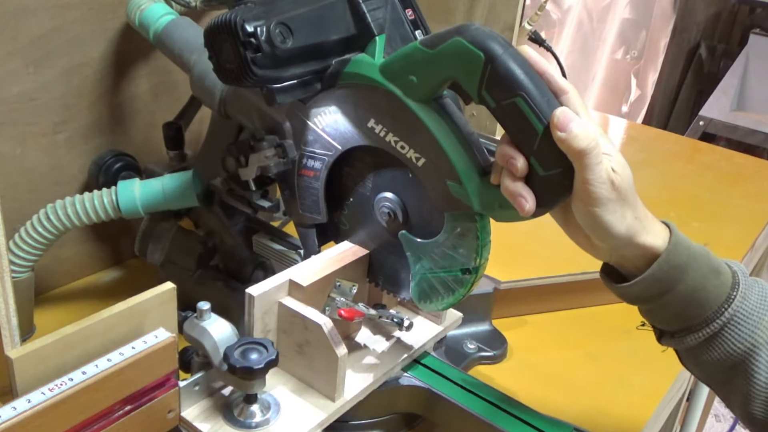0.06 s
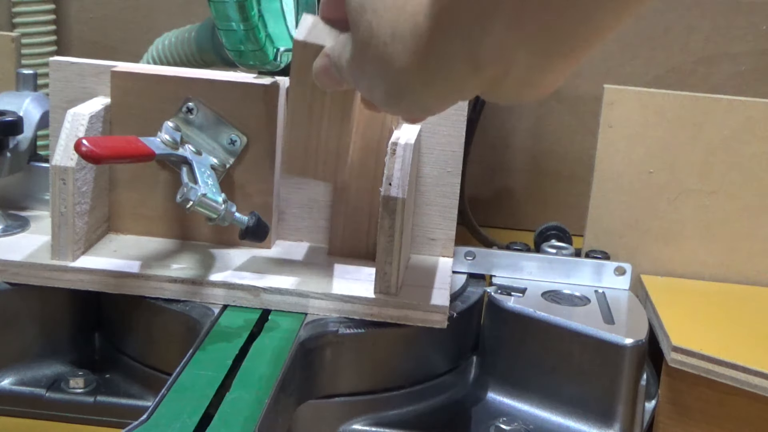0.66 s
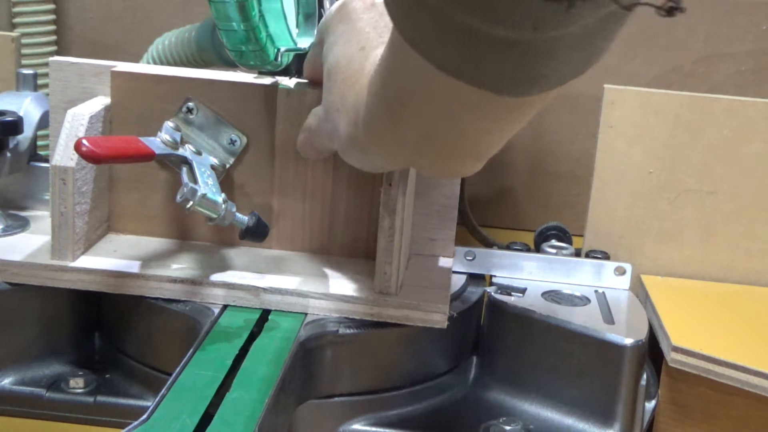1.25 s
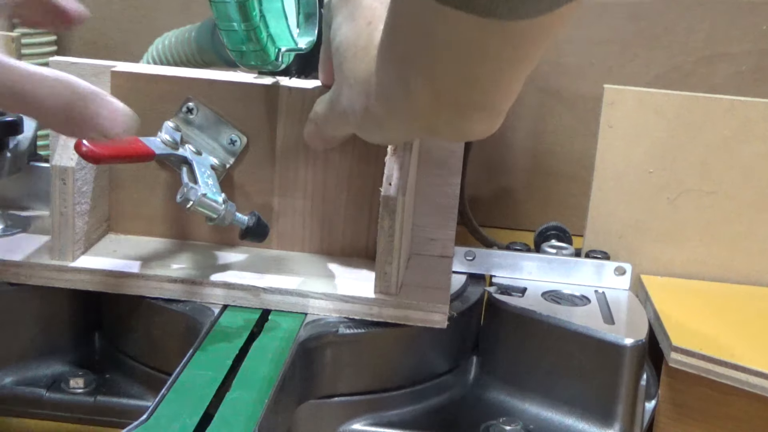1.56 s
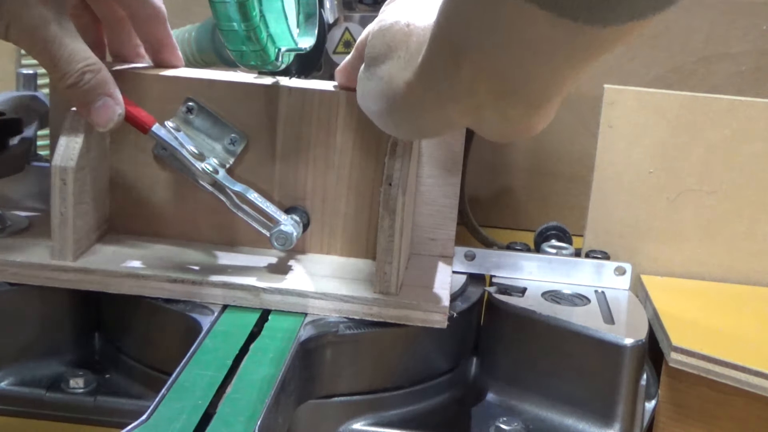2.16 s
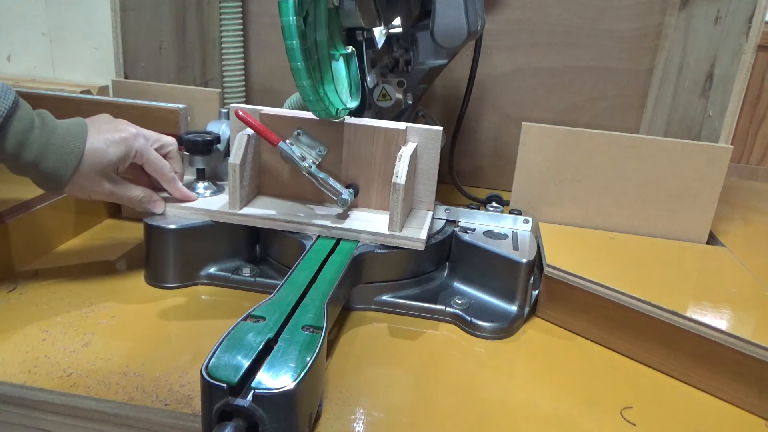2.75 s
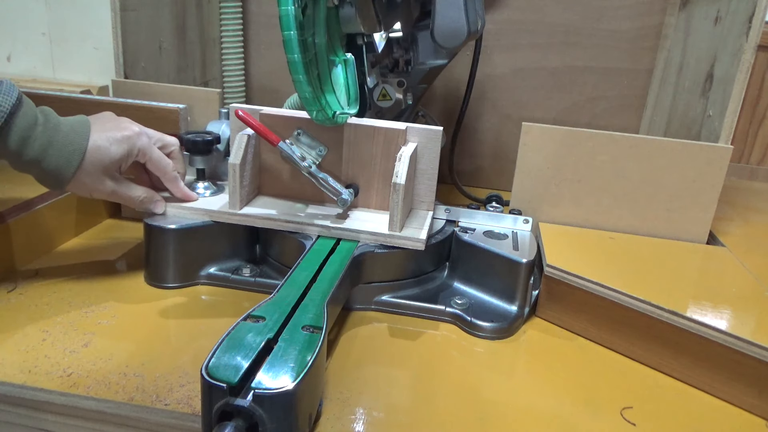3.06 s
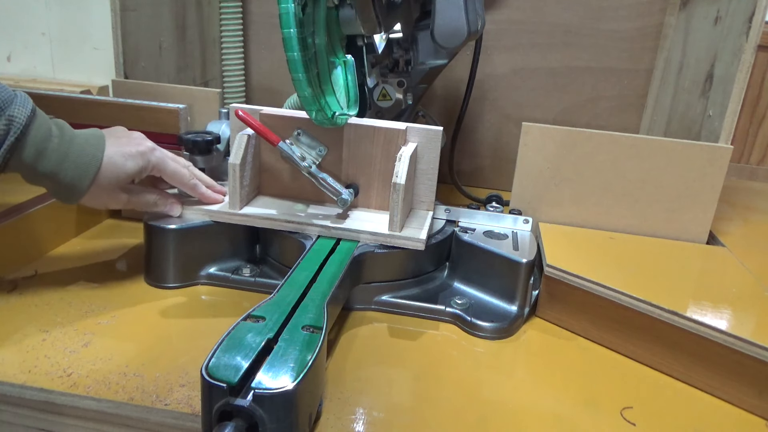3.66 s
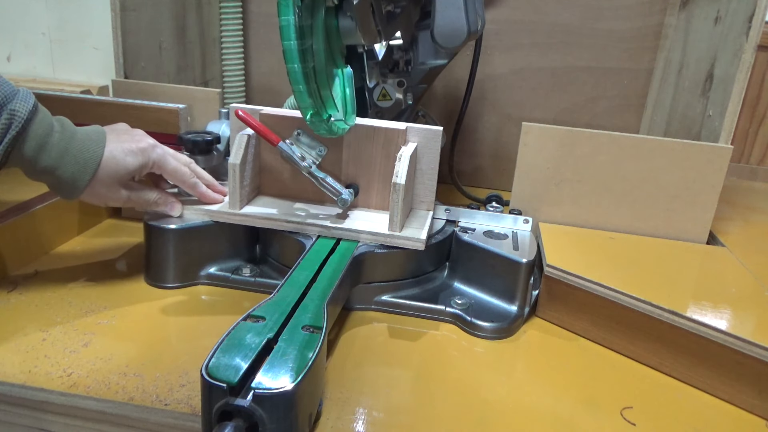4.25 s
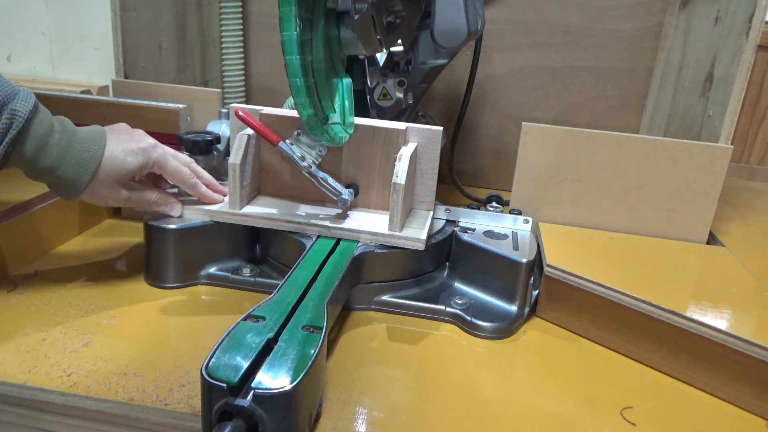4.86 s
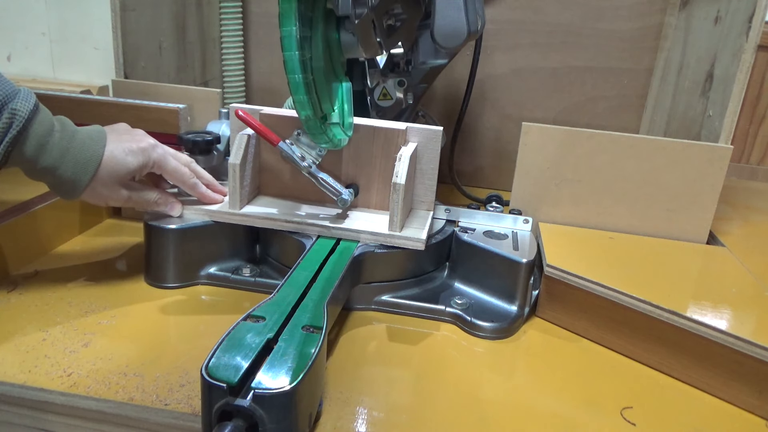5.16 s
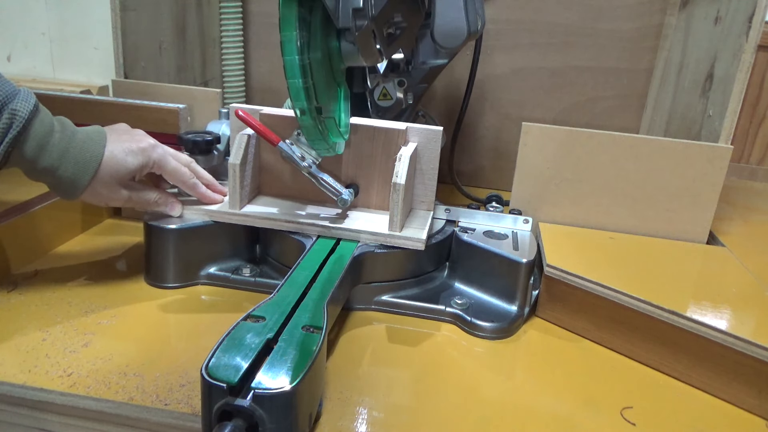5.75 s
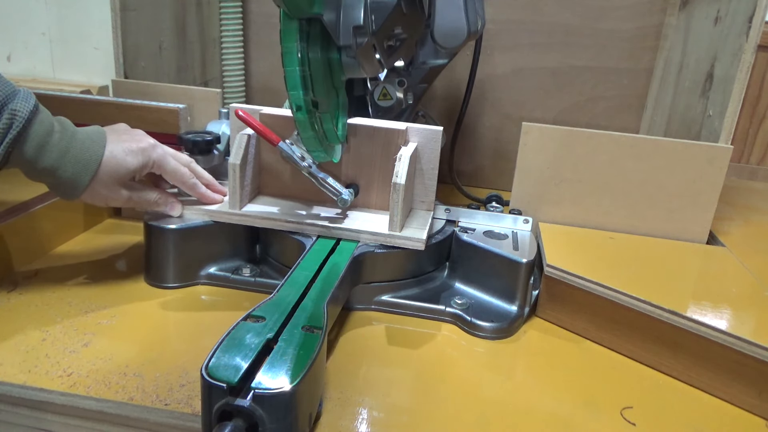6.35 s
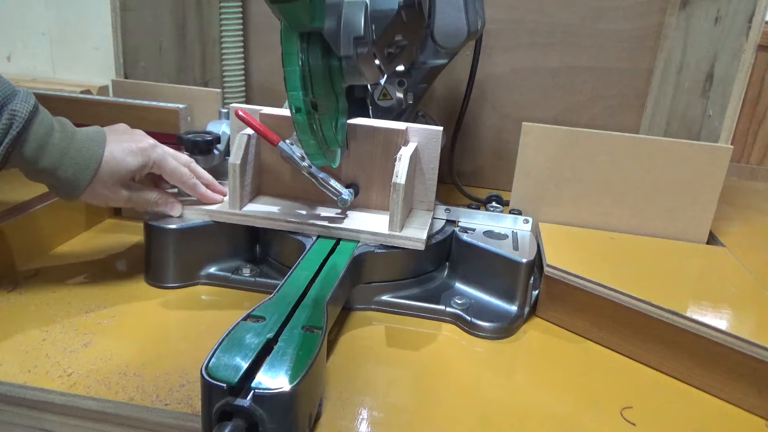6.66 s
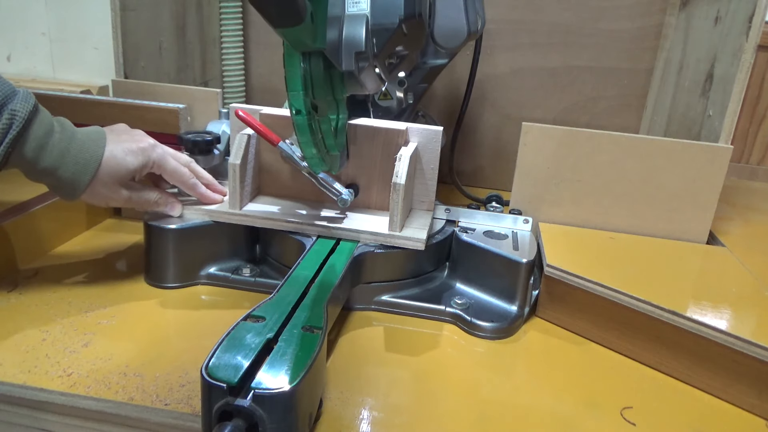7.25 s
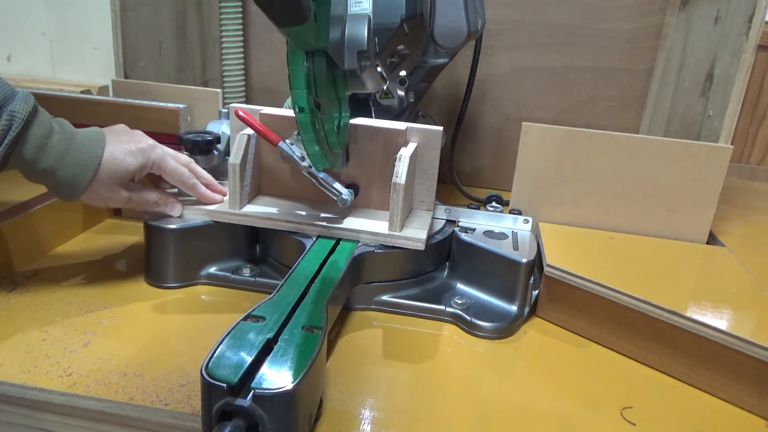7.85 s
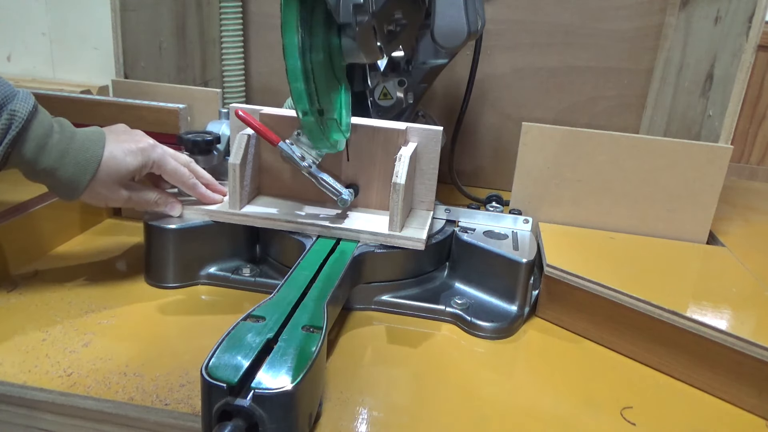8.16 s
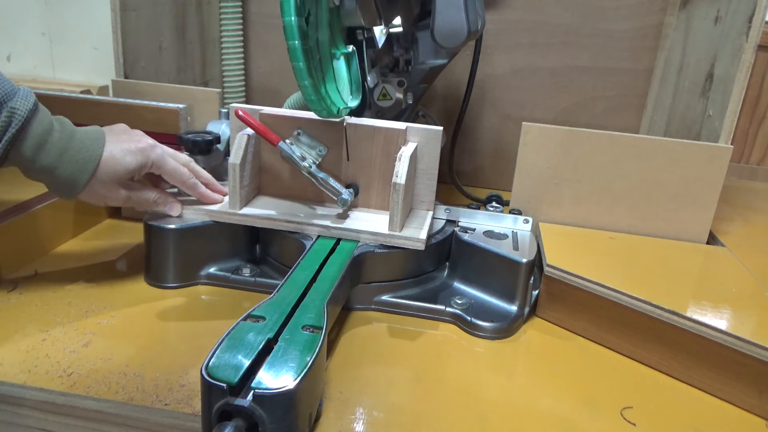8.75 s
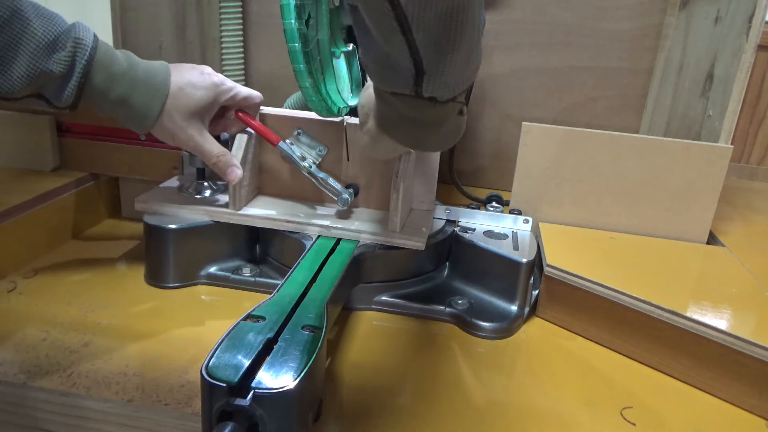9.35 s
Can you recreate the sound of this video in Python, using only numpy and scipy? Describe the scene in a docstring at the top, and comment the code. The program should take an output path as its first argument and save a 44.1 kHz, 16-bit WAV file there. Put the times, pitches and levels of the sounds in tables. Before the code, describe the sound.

Wood knocks and a clamp snaps shut, then a miter saw whines up, cuts slowly and winds down over a humming extractor.

```python
"""A miter saw at work in a small workshop, heard in stereo from close by the bench.
First a block of wood is set into the jig and a toggle clamp snaps shut. A dust extractor is suddenly
there, humming, and the saw spins up and runs free, its rotor whining in a rush of fan air. The rush drops
abruptly and the two gear stages sing as the blade is lowered slowly through the wood. The brake pulls
the motor down in a falling whine, and the extractor runs on."""
import sys
import numpy as np
from scipy import signal
from scipy.fft import rfft, irfft, next_fast_len
from scipy.io import wavfile

SR = 44100
rng = np.random.default_rng(int(sys.argv[2]) if len(sys.argv) > 2 else 0)


def generate_wav(sig):
    """Save sig (samples, or channels by samples) to the path in sys.argv[1] as 16-bit PCM at SR."""
    pcm = np.round(np.clip(np.atleast_2d(sig).T, -1, 1) * 32767).astype(np.int16)
    wavfile.write(sys.argv[1], SR, pcm)


N = 419391
T = np.arange(N) / SR
SWITCH_ON_S, OVERSHOOT_AT_S, FEED_START_S, TRIGGER_OFF_S, BRAKE_ON_S = 2.524, 2.86, 4.635, 8.28, 8.38
FULL_SPEED_HZ, ROTOR_TEETH, WHEEL_TEETH, ROTOR_SLOTS = 219.9, 13, 22, 36


def from_db(db):
    """Decibels to gain."""
    return 10 ** (np.asarray(db) / 20)

def rms_one(x):
    """Scale to rms 1."""
    return x / np.sqrt(np.mean(x ** 2) + 1e-20)

def in_time(rows):
    """Each column of a curve, at every sample."""
    times, *columns = np.transpose(rows)
    return [np.interp(T, times, column) for column in columns]

def at_hz(points, hz):
    """Read a spectrum on a log-frequency axis."""
    known_hz, values = np.transpose(points)
    return np.interp(np.log(np.maximum(hz, 1e-3)), np.log(known_hz), values)

def drift(rate, step=40):
    """Smooth random wander of rms 1, changing about rate times a second."""
    pole = np.exp(-2 * np.pi * step * rate / SR)
    slow = signal.lfilter([1], [1, -2 * pole, pole * pole], rng.standard_normal(N // step + 2002))[2000:]
    return np.interp(np.arange(N) / step, np.arange(len(slow)), rms_one(slow))

def after(start, rise_s=.004):
    """A straight ramp from 0 to 1."""
    return np.clip((T - start) / rise_s, 0, 1)

def held(start, end, rise, fall):
    """Swell smoothly around the start, hold, and fade around the end."""
    return (1 + np.tanh((T - start) / (2 * rise))) * (1 - np.tanh((T - end) / (2 * fall))) / 4

def tone(turns, flutter=0., rate=10):
    """A sine of rms about 1 whose height flutters."""
    return np.sqrt(2) * np.sin(2 * np.pi * turns) * (1 + flutter * drift(rate))

def ring(x, hz, t60):
    """One resonance, dying by 60 dB in t60 seconds."""
    pole, angle = from_db(-60 / (t60 * SR)), 2 * np.pi * hz / SR
    return signal.lfilter([0, np.sin(angle)], [1, -2 * pole * np.cos(angle), pole * pole], x + 1e-18)

def bandpass(x, low_hz, high_hz):
    """Keep one band, with gentle slopes."""
    return signal.sosfilt(signal.butter(2, [low_hz, high_hz], "band", fs=SR, output="sos"), x)

def pan(x, db):
    """Place a sound left (+) or right (-) of the microphone."""
    return x * from_db(np.array([[db], [-db]]) / 2)

# Stereo width at the microphone. Each row: frequency in Hz, side against mid in dB.
STEREO_WIDTH = [(30, -10), (70, -27), (250, -34.5), (600, -10.5), (1100, -6), (2500, -10.5), (5000, -12),
                (9000, -19.5), (14000, -14.5)]
def noise(spectrum):
    """Stereo noise of a given colour and rms 1, nearly alike in both channels."""
    size = next_fast_len(N, real=True)
    hz = np.arange(size // 2 + 1) * SR / size
    mid, side = rfft(rng.standard_normal((2, size))) * from_db(at_hz(spectrum, hz))
    side = side * from_db(at_hz(STEREO_WIDTH, hz))
    return rms_one(irfft([mid + side, mid - side], size)[:, :N])

# The quiet shop. Each row: frequency in Hz, relative level in dB.
ROOM_COLOUR = [(40, -1), (100, -3), (200, 0.5), (320, -0.5), (500, 3.5), (1000, 0), (2000, -2.5),
               (3700, -6), (5600, -6.5), (6350, -1), (7000, -7), (10000, -7), (16000, -21)]
def room_tone():
    """A faint, steady noise all around the microphone."""
    return from_db(-70.5) * noise(ROOM_COLOUR)

# The whistle's lower tone. Each row: time in seconds, pitch in Hz, level in dB.
WHISTLE_PATH = [(0, 7240, -70), (0.06, 7550, -68), (0.105, 7600, -65), (0.115, 7650, -120)]
def whistle():
    """Two thin, unsteady tones rise and stop at the outset."""
    hz, db = in_time(WHISTLE_PATH)
    turns = np.cumsum(hz) / SR
    lower = tone(turns + .4 * drift(150))
    upper = from_db(-4) * tone(1.48 * turns + .5 * drift(150))
    return from_db(db) * (lower + upper)

# Rubs on the jig. Each row: centre and half length in seconds, hollow and hiss levels in dB.
RUBS = [(0.265, .01, -78, -67), (0.34, 0.025, -72, -69), (0.489, 0.014, -65, -57.5),
        (0.696, 0.035, -70, -62.5), (0.806, 0.035, -59, -74), (0.965, 0.017, -59.5, -72),
        (1.06, 0.041, -64.5, -59), (1.204, .04, -65, -72), (1.296, 0.026, -58, -67),
        (1.403, 0.021, -59, -62), (1.718, .04, -61, -67.5), (1.904, 0.018, -60.5, -64)]
# The two parts of a rub. Each row: frequency in Hz, relative level in dB.
HOLLOW_COLOUR = [(90, -30), (160, -5), (280, -13), (480, 5), (750, -15), (1100, -13), (2400, -13),
                 (4000, -34)]
HISS_COLOUR = [(1500, -15), (3000, -1), (4500, -5), (8000, -4), (11000, -10), (16000, -7)]
def handling():
    """Fingers and wood slide on the jig; each rub swells and fades."""
    centre, half_length, hollow_db, hiss_db = np.transpose(RUBS)
    strokes = np.exp(-.5 * ((T - centre[:, None]) / half_length[:, None]) ** 2)
    hollow = from_db(hollow_db) @ strokes * from_db(3.6 * drift(50)) * noise(HOLLOW_COLOUR)
    hiss = from_db(hiss_db) @ strokes * from_db(2.5 * drift(80)) * noise(HISS_COLOUR)
    return hollow + hiss

# Block, jig and clamp at the bench. Each row: start in seconds, strength in dB, low and high band
# edges in Hz, note in Hz, contact time in milliseconds.
CONTACTS = [(0.528, -41, 200, 900, 420, 12), (0.585, -31, 850, 7000, 1420, 2.5),
            (0.586, -33, 1050, 6000, 2900, 1.4), (0.732, -32.5, 350, 2540, 1970, 2.8),
            (0.736, -26.5, 350, 703, 492, 3.6), (0.82, -49, 400, 3000, 2850, 3.6),
            (0.934, -46, 500, 4500, 2850, 2.7), (1.097, -24.5, 150, 1780, 1900, 3.7),
            (1.310, -23, 300, 5130, 476, 2.5), (1.946, -30, 250, 1600, 484, 2.7),
            (2.0528, -10.5, 450, 10500, 3260, 2.6), (2.382, -36, 700, 7950, 3770, 2)]
# The ringing jig. Each row: frequency in Hz, relative level in dB, seconds to fall 60 dB.
JIG_MODES = [(478, -8.5, 0.083), (990, -1.5, 0.028), (1540, -5, .025), (2030, 6, 0.02), (2390, 4, 0.027),
             (2960, 0.5, 0.017), (3400, 1.5, 0.011), (4650, 1, 0.0073), (5500, -10, .012)]
# The crack of a contact. Each row: frequency in Hz, relative level in dB.
CRACK_COLOUR = [(100, -15), (400, -0.5), (1500, -6), (3200, 0), (5500, -4), (7000, -9.5), (9000, -5.5),
                (16000, -5)]
def knocks(size=8820):
    """Each contact is a crack, the ringing jig and the brief note of the struck spot."""
    direct, t = np.zeros(N), np.arange(size) / SR
    grit = noise(CRACK_COLOUR)[0]
    for start, db, low_hz, high_hz, note_hz, contact_ms in CONTACTS:
        i = round(start * SR)
        crack = grit[i:i + size] * (np.exp(-t * 1e3 / contact_ms) + .11 * np.exp(-t / .011))
        jig = 0
        for hz, mode_db, t60 in JIG_MODES:
            height = from_db(mode_db + rng.normal(0, 2.7)) * rng.choice([-1, 1])
            jig += height * np.sin(2 * np.pi * hz * t) * from_db(-60 * t / t60)
        note = from_db(-10.5) * np.sin(2 * np.pi * note_hz * t) * np.exp(-t * note_hz / 4.4)
        hit = bandpass(from_db(-.5) * crack + from_db(-15) * jig + note, low_hz, high_hz)
        direct[i:i + size] += from_db(db) * (hit + from_db(-36) * crack)
    return direct + from_db(-11) * shop_reverb(direct)

# The workshop's decay. Each row: frequency in Hz, seconds to fall 60 dB.
SHOP_DECAY = [(100, 0.42), (1000, 0.27), (3500, 0.31), (7000, 0.19), (16000, .17)]
# What the walls send back. Each row: frequency in Hz, relative level in dB.
WALL_COLOUR = [(100, -20.5), (800, 6), (3300, 0), (6000, -1), (16000, -10)]
def shop_reverb(x, size=22050):
    """The small room answers, each band dying at its own rate."""
    t, tail = np.arange(size) / SR, 0
    edges = np.geomspace(60, 17000, 9)
    for low, high in zip(edges, edges[1:]):
        hz = np.sqrt(low * high)
        mid, side = bandpass(rng.standard_normal((2, size)), low, high)
        decay = from_db(at_hz(WALL_COLOUR, hz) - 60 * t / at_hz(SHOP_DECAY, hz))
        tail += (mid + .33 * side * [[1], [-1]]) * decay
    return signal.fftconvolve(x[None], rms_one(tail) / np.sqrt(size), axes=1)[:, :N]

# The extractor, just right of centre. Each row: frequency in Hz, relative level in dB.
HUM_TONES = [(118.4, -48.5), (349.9, -46.5), (549.1, -46.5), (613.7, -50.5), (936.7, -38.5), (1141, -48),
             (1873, -48)]
SUCTION_COLOUR = [(18, -24), (30, -22), (81, -21), (108, -7.5), (279, -3.5), (344, -2.5), (435, -3),
                  (551, 0.5), (698, -4.5), (931, -3.5), (1380, -5.5), (1840, -6), (4980, -14.5),
                  (12800, -21.5), (15800, -28)]
# Its hose. Each row: resonance in Hz, bandwidth in Hz, relative level in dB.
HOSE_MODES = [(128, 14, -81), (336, 23, -55), (544, 36, -40.5), (614, 18, -45), (921, 66, -40.5)]
def extractor(spool_db=-4, spool_s=.26, recorder_gain_db=-10.5):
    """Motor and impeller hum steadily over suction noise that resonates in the hose."""
    hum = hose = 0
    for hz, db in HUM_TONES:
        hum += from_db(db) * tone(hz * (T + .00008 * drift(3.1)), flutter=.16, rate=12)
    for hz, width, db in HOSE_MODES:
        airflow = np.diff(rng.standard_normal(N + 1))
        hose += from_db(db) * rms_one(ring(airflow, hz, t60=np.log(1000) / (np.pi * width)))
    suction = from_db(-34.5) * noise(SUCTION_COLOUR)
    turned_down = after(FEED_START_S) * (1 - after(7.13, rise_s=1.92))
    spooling = np.exp(-np.maximum(T - SWITCH_ON_S, 0) / spool_s)
    level = from_db(.5 + spool_db * spooling + recorder_gain_db * turned_down) * after(SWITCH_ON_S)
    return pan((hum + hose + suction) * level, db=-1)

def brush_ring():
    """Brush noise rings the motor housing from switch-on until the rush covers it."""
    housing = rms_one(ring(rng.standard_normal(N), hz=4060, t60=.013))
    return from_db(-48.5) * housing * after(SWITCH_ON_S) * (1 - after(OVERSHOOT_AT_S))

# The countershaft under load. Each row: time in seconds, speed in turns per second.
COUNTERSHAFT_SPEED = [(4.68, 129.78), (4.84, 129.33), (5.16, 129.34), (5.4, 128.83), (5.48, 129.08),
                      (5.96, 129.0), (6.16, 128.9), (6.24, 128.33), (6.28, 129.06), (6.52, 128.71),
                      (6.56, 128.91), (7.04, 128.8), (7.16, 129.81), (7.52, 128.93), (7.64, 129.44),
                      (7.72, 130.83), (8.16, 129.56), (8.24, 130.02)]
def rotor_speed(ungoverned_hz=244.7, run_up_mid_s=2.739, overshoot_hz=14, settle_s=.09, brake_s=.6):
    """Turns per second: the motor overshoots, is governed, takes the load, then brakes, hard at first."""
    run_up = ungoverned_hz * (1 + np.tanh((T - run_up_mid_s) / .086)) / 2
    governed = FULL_SPEED_HZ + overshoot_hz * np.exp(-np.maximum(T - OVERSHOOT_AT_S, 0) / settle_s)
    feeding = in_time(COUNTERSHAFT_SPEED)[0] * WHEEL_TEETH / ROTOR_TEETH
    driven = np.where(T < FEED_START_S, np.minimum(run_up, governed), feeding)
    return driven / (1 + np.maximum(T - BRAKE_ON_S, 0) / brake_s) ** 3.75

def octaves_down(speed):
    """How many octaves the rotor is below full speed."""
    return np.log2(FULL_SPEED_HZ / (speed + 1e-9))

# The saw's air running free, in the cut and at the bottom of the stroke.
# Each row: frequency in Hz, relative level in dB.
FREE_COLOUR = [(120, -49), (200, -18.5), (610, -15.5), (644, -10), (706, -16.5), (929, -8), (1040, -11),
               (1340, -11), (2080, -11.5), (2630, -8.5), (4900, -9), (8330, -4), (10000, -7.5),
               (12700, -5.5), (15800, -10)]
CUT_COLOUR = [(90, -12), (180, -4), (300, -8), (550, -3), (900, 0.5), (1500, -0.5), (2800, 5.5),
              (3500, 1.5), (5000, 2.5), (6500, 7.5), (9000, 6.5), (11000, 4.5), (12500, 10), (15000, 12),
              (16000, -0.5)]
DEEP_COLOUR = [(120, -50), (200, -23), (258, 0.5), (294, -32), (610, -15), (656, -8), (788, -16),
               (929, -8.5), (1670, -11.5), (3050, -3.5), (4560, -7), (4810, -9), (5680, -2.5),
               (14200, -1.5), (15800, -7.5)]
# That air once the head comes down. Each row: time in seconds, level at full speed in dB.
CUT_AIR_LEVEL = [(4.65, -26.5), (5.2, -22.5), (6.3, -24), (7.09, -26), (7.15, -22.5), (7.7, -20.5),
                 (8.2, -21.5)]
def air_rush(speed, free_db=-19, db_per_octave=7):
    """The rush of fan and blade grows with speed and changes colour as the head comes down."""
    cutting, deep = after(FEED_START_S), after(7.58, rise_s=.18)
    free_air = noise(FREE_COLOUR)
    cut_air = np.sqrt(1 - deep) * noise(CUT_COLOUR) + np.sqrt(deep) * noise(DEEP_COLOUR)
    rush = (1 - cutting) * free_air + cutting * cut_air
    level_db = (1 - cutting) * free_db + cutting * in_time(CUT_AIR_LEVEL)[0]
    level_db += .25 * drift(20) - db_per_octave * octaves_down(speed)
    return pan(rush * after(SWITCH_ON_S, rise_s=.08) * from_db(level_db), db=.3)

# Starting and braking. Each row: start and end in seconds, relative levels of mesh, rasp and slot
# whine in dB, the whine's loss in dB per halving of speed, its loss in dB per harmonic.
TORQUE_SURGES = [(2.689, 2.85, 1.5, -6, -17.5, 3, 28), (8.38, 9.0, -1.5, 1.5, -20, 8, 3)]
# How the gear case radiates mesh and rasp, and the motor housing the slot whine.
# Each row: frequency in Hz, gain in dB.
MESH_RESPONSE = [(470, -58), (1120, -38), (1450, -23), (1700, -30), (2300, -20), (3000, -25)]
RASP_RESPONSE = [(900, -46), (1600, -39), (2400, -50), (3800, -41), (4900, -17), (5500, -17), (6100, -27)]
HOUSING_RESPONSE = [(500, -14), (2000, -11), (3100, -9), (4000, 4), (5000, -5), (6400, 5.5), (8000, -1),
                    (12000, -10), (16000, -16), (20000, -80)]
def torque_howl(speed, turns):
    """Torque makes the first mesh howl and rasp; slot pulses sweep across the housing's resonances."""
    mesh_hz, mesh_turns = ROTOR_TEETH * speed, ROTOR_TEETH * turns
    shudder = np.where(T < FEED_START_S, .25, .05) * drift(160)   # stronger starting than braking
    slot_turns = ROTOR_SLOTS * turns + shudder
    mesh = from_db(at_hz(MESH_RESPONSE, mesh_hz)) * tone(mesh_turns, flutter=.33, rate=52)
    rasp = tone(2 * mesh_turns + .25 * drift(148), flutter=.3, rate=130)
    rasp *= from_db(at_hz(RASP_RESPONSE, 2 * mesh_hz))
    harmonics, howl = [], 0
    for k in range(1, 6):
        radiated_db = at_hz(HOUSING_RESPONSE, k * ROTOR_SLOTS * speed) + 3 * drift(19)
        harmonics.append(from_db(radiated_db) * np.sin(2 * np.pi * k * slot_turns))
    for start, end, mesh_db, rasp_db, slot_db, slowing_db, fall_db in TORQUE_SURGES:
        slots = sum(from_db(-fall_db * k) * harmonic for k, harmonic in enumerate(harmonics))
        slots *= from_db(slot_db + 3.5 - slowing_db * np.minimum(octaves_down(speed), 10))
        slots *= 1 + .37 * drift(120)
        torque = held(start, end, rise=.0019, fall=.014)
        howl += torque * (from_db(mesh_db) * mesh + from_db(rasp_db) * rasp + slots)
    return from_db(-4) * howl + from_db(-11.5) * shop_reverb(howl)

def revolving(turns, lines, loose, rate, size=8192):
    """A pattern that repeats with each turn of a shaft; a loose share keeps changing at even power."""
    multiples, db = np.transpose(lines)
    position = (turns % 1 * size).astype(int) % size
    blend = np.array([drift(rate) for _ in range(4)])
    blend /= np.linalg.norm(blend, axis=0)
    pattern = 0
    for weight in [np.sqrt(1 - loose), *(np.sqrt(loose) * blend)]:
        orders = np.zeros(size // 2 + 1, complex)
        orders[np.round(multiples).astype(int)] = from_db(db) * np.exp(2j * np.pi * rng.random(len(db)))
        pattern += weight * (irfft(orders) * size / np.sqrt(2))[position]
    return pattern

# The free-running saw, drone first. Each row: multiple of rotor speed, relative level in dB.
ROTOR_ORDERS = [(3, -29), (6, -37.5), (12, -39), (13, -39.5), (14, -47), (18, -36), (21, -43), (24, -42),
                (26, -36), (36, -40), (37, -35), (38, -34.5), (39, -27.5), (48, -52), (52, -50), (54, -31),
                (63, -40)]
# The drone, a little to the right. Each row: time in seconds, gain in dB.
DRONE_GAIN = [(4.6, -3.5), (4.7, -14.5), (7.55, -10.5), (7.8, -2.5), (8.12, -18), (8.33, -7)]
def rotor_whine(speed, turns, db_per_octave=25):
    """Fan blades and rotor slots whine near full speed; only the low drone stays once the feed begins."""
    (drone_multiple, drone_db), *upper_orders = ROTOR_ORDERS
    drone_level = from_db(drone_db + in_time(DRONE_GAIN)[0] - db_per_octave * octaves_down(speed))
    drone = drone_level * tone(drone_multiple * turns, flutter=.12, rate=12)
    whine = (1 - after(FEED_START_S)) * revolving(turns, upper_orders, loose=.12, rate=12)
    return after(2.813, rise_s=.24) * (pan(drone, db=-2.15) + pan(whine, db=.2))

# The gears in the cut, near centre: lasting tones, sidebands from uneven teeth, and the outline of a
# weaker buzz between them. Each row: multiple of countershaft speed, relative level in dB.
MESH_TONES = [(15, -57), (22, -39.5), (24, -43.5), (30, -41.5), (34, -54), (45, -37), (60, -44),
              (75, -36.5), (94, -41), (105, -46), (108, -37), (117, -47)]
TOOTH_SIDEBANDS = [(1, -58.5), (2, -59), (4, -42.5), (16, -38), (17, -51), (20, -43.5), (21, -42),
                   (23, -39), (25, -38), (43, -44.5), (44, -39), (47, -38.5), (48, -47.5), (51, -58),
                   (52, -62), (55, -59), (61, -38), (65, -44), (72, -48), (73, -58), (77, -44), (80, -60),
                   (90, -36.5), (92, -50), (96, -53), (99, -33), (104, -49), (108, -32), (109, -49),
                   (114, -43), (117, -45), (120, -46)]
BUZZ_OUTLINE = [(3, -63), (12, -53), (25, -59), (38, -62), (48, -51.5), (70, -45.5), (85, -47), (97, -43),
                (110, -47), (122, -56)]
# Tones that ring out for a while. Each row: start and end in seconds, multiple, relative level in dB.
TONE_SWELLS = [(4.64, 5.22, 30, -29.5), (4.62, 5.2, 60, -32), (4.62, 5.13, 75, -23), (4.66, 4.9, 45, -34),
               (4.78, 7.75, 15, -29.5), (4.82, 7.62, 105, -32), (5.12, 7.5, 22, -34.5),
               (5.33, 6.38, 75, -25.5), (5.5, 7.3, 117, -35), (5.7, 6, 94, -29), (5.97, 5.9, 105, -25),
               (6.03, 6.17, 45, -35), (6.7, 7.6, 30, -42), (6.18, 6.31, 25, -32), (6.398, 7.3, 75, -26),
               (7.119, 7.68, 22, -35.5), (7.69, 7.85, 34, -29), (7.97, 8.26, 24, -35.5)]
def gear_song(turns, wander_db=2):
    """The countershaft carries both meshes, so all gear tones are multiples of its speed."""
    shaft = turns * ROTOR_TEETH / WHEEL_TEETH
    heights = {k: from_db(db + wander_db * drift(.93)) for k, db in MESH_TONES}
    for start, end, k, db in TONE_SWELLS:
        ease_s = .052 * np.sqrt(abs(end - start))   # longer swells are gentler
        heights[k] = heights.get(k, 0) + from_db(db) * held(start, end, ease_s, ease_s)
    tones = sum(height * tone(k * shaft, flutter=.17, rate=15) for k, height in heights.items())
    bite = from_db(-7) + from_db(-5) * held(5.07, 7.9, rise=.056, fall=.056)   # teeth deep in the wood
    sidebands = bite * revolving(shaft, TOOTH_SIDEBANDS, loose=.25, rate=5)
    between = np.setdiff1d(np.arange(3, 123), [k for k, _ in TOOTH_SIDEBANDS + MESH_TONES])
    buzz_db = 3.3 + at_hz(BUZZ_OUTLINE, between) + rng.normal(0, 2, len(between))
    buzz = revolving(shaft, np.c_[between, buzz_db], loose=.45, rate=4)
    pressure = 1 + .06 * np.cos(2 * np.pi * shaft)   # the wheel bears harder once a turn
    driven = after(FEED_START_S) * (1 - after(TRIGGER_OFF_S))
    return driven * pressure * (pan(from_db(.58) * tones, db=1) + pan(sidebands + buzz, db=.18))

def scene():
    """The workshop from the bench; one shaft speed drives the saw's whine, gears and air."""
    speed = rotor_speed() * (1 + .00022 * drift(30) + .0002 * drift(2))
    turns = np.cumsum(speed) / SR
    saw = rotor_whine(speed, turns) + gear_song(turns) + torque_howl(speed, turns)
    saw += brush_ring() + air_rush(speed)
    return saw + extractor() + knocks() + handling() + room_tone() + whistle()

def record(dry, low_cut_hz=55, high_cut_hz=15850):
    """At the microphone the deep bass rolls off and the very top is cut steeply."""
    lean = signal.sosfilt(signal.butter(2, low_cut_hz, "high", fs=SR, output="sos"), dry)
    return signal.sosfilt(signal.ellip(12, .1, 80, high_cut_hz, fs=SR, output="sos"), lean)


dry = scene()
out = record(dry)
generate_wav(out)
```